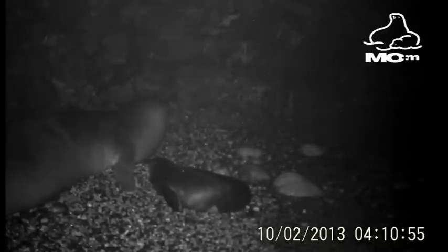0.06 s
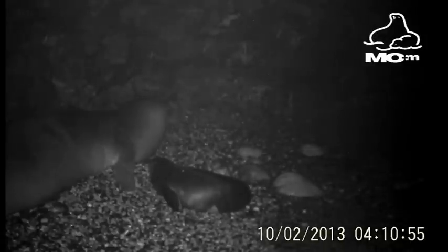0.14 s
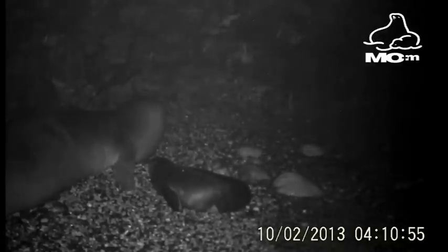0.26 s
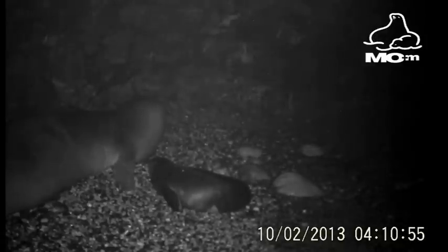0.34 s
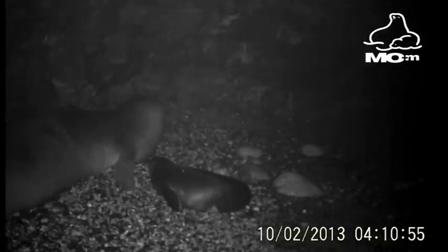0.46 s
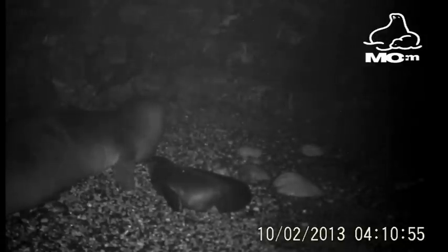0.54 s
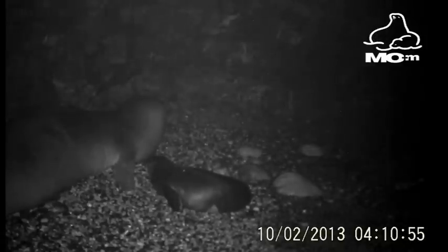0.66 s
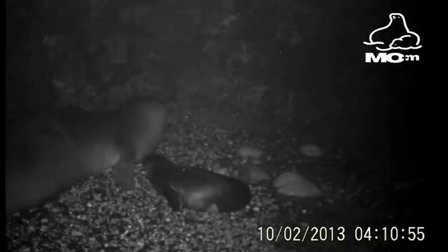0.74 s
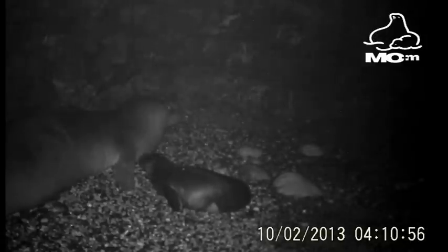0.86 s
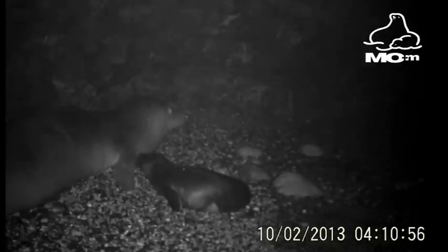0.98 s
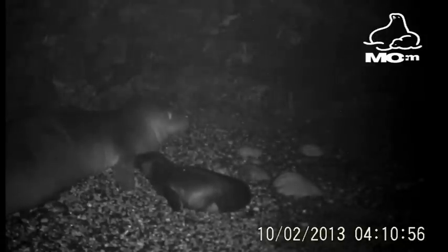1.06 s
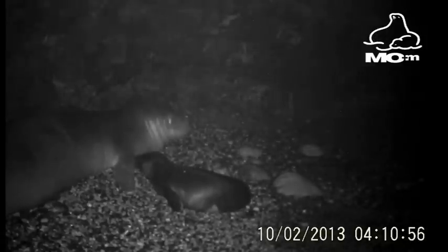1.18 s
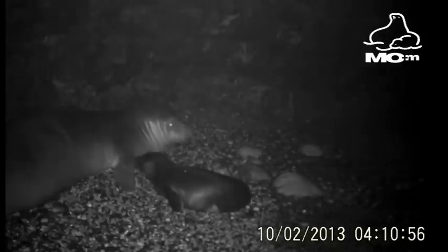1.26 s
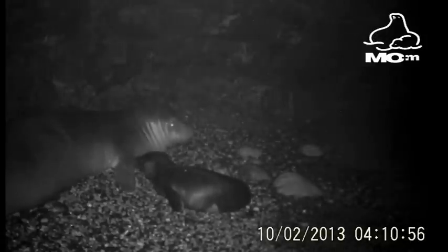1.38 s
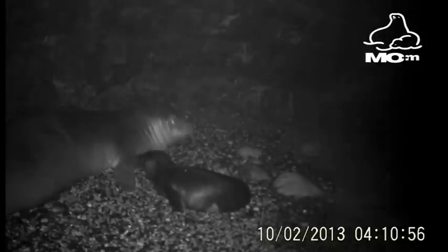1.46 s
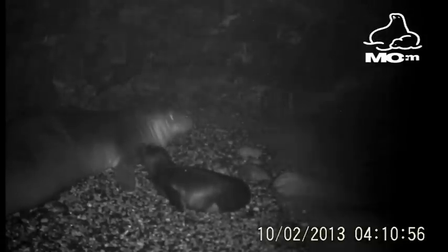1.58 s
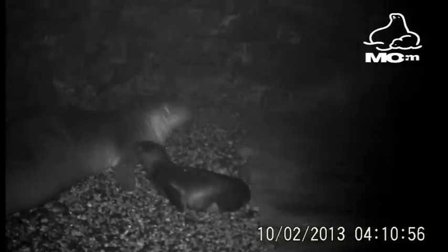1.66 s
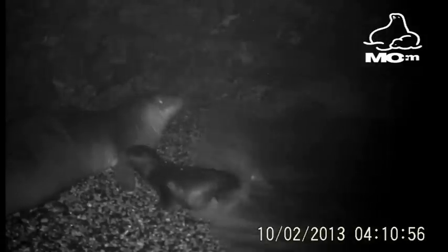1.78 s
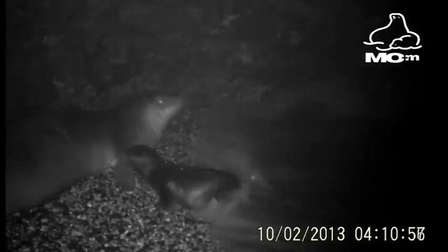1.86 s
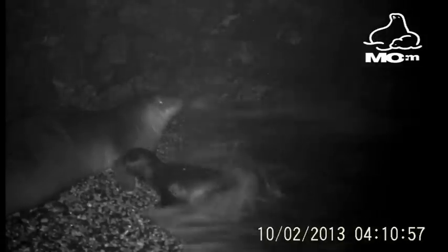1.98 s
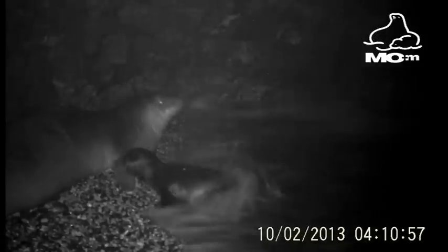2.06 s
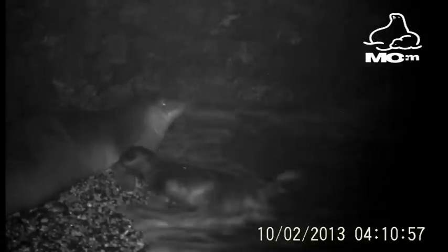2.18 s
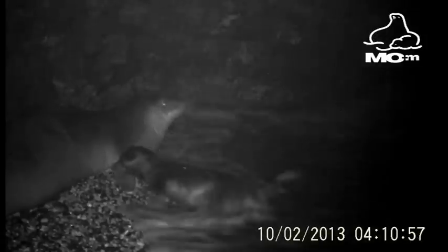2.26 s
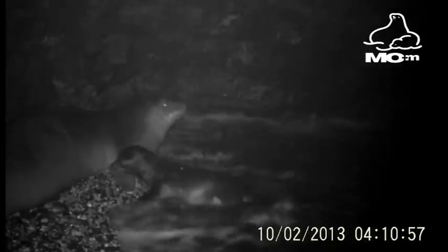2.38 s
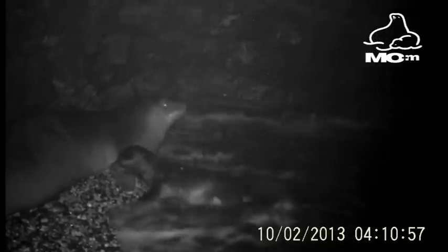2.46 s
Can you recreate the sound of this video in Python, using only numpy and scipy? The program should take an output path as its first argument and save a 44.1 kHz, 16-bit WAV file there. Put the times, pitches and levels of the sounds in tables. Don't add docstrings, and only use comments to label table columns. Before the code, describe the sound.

A sea wave in a rocky cave. Faint bubbly foam hiss with soft low air thuds at 0.2-0.4 s; the rush swells from 0.7 s, with a small slap near 0.9 s. At 1.0 s the crest breaks in a dull hollow thump, tumbling and gurgling, with another low blow at 1.35 s. Hissing foam lingers, light slaps at 1.55-1.95 s, then it drains and fades by 2.5 s.

```python
import sys
import numpy as np
from scipy import signal
from scipy.fft import rfft, irfft
from scipy.io import wavfile
from scipy.ndimage import uniform_filter1d

SR = 44100
rng = np.random.default_rng(int(sys.argv[2]) if len(sys.argv) > 2 else 0)


def voltage_ratio(decibels):
    exponent = np.asarray(decibels, float) / 20
    return 10 ** exponent


def generate_wav(signal):
    frames = np.transpose(np.atleast_2d(signal))
    scaled = np.clip(frames, -1, 1) * 32767
    pcm = np.round(scaled).astype(np.int16)
    wavfile.write(sys.argv[1], SR, pcm)


N = 112455


def rms_one(x):
    return x / np.sqrt(np.mean(x ** 2) + 1e-20)


def in_time(rows):
    s, *columns = np.transpose(rows)
    return [np.interp(np.arange(N) / SR, s, column) for column in columns]


def drift(rate_hz):
    thin = 40
    pole = np.exp(-2 * thin * np.pi * rate_hz / SR)
    white = rng.standard_normal(N // thin + 2002)
    slow = signal.lfilter([1], [1, -2 * pole, pole * pole], white)[2000:]
    return np.interp(np.arange(N) / thin, np.arange(len(slow)), rms_one(slow))


def flutter(rate_hz):
    x = drift(rate_hz)
    return rms_one(x - uniform_filter1d(x, size=int(SR / 4)))


def band(x, low_hz, high_hz, order=2):
    return signal.sosfilt(signal.butter(order, [low_hz, high_hz], "band", fs=SR, output="sos"), x)


def between(x, low_hz, high_hz, edge_hz):
    hz = np.fft.rfftfreq(N, 1 / SR)
    keep = np.clip(.5 + np.minimum(hz - low_hz, high_hz - hz) / edge_hz, 0, 1)
    return irfft(rfft(x) * np.sin(keep * np.pi / 2) ** 2, N)


def churn(colour, patchy_db, shared, tilt_db=0):
    hz, db = np.transpose(colour)
    edges = 14 * 2 ** np.arange(0, 10, 1 / 3)
    white = rng.standard_normal((2, N + SR))
    together = flutter(10.3) + flutter(30)
    out, power = 0, 0
    for k, (low, high) in enumerate(zip(edges, edges[1:])):
        mid = np.sqrt(low * high)
        level = np.interp(np.log(mid), np.log(hz), db, left=-70, right=-70)
        flicker = patchy_db * (shared * together + flutter(9.1))
        if level > -69:
            tilted = level + tilt_db * np.log2(mid / 2500)
            out = out + voltage_ratio(tilted + flicker) * band(white[k % 2], low, high)[SR:]
            power = power + voltage_ratio(tilted) ** 2 * (high - low)
    return out / np.sqrt(2 * power / SR)


def bubbles(level_db):
    per_second, cycles, pitches = 5000, 4, 24
    sizes = voltage_ratio(4.7 * np.minimum(rng.exponential(1, N), 5)) * rng.choice([-1, 1], N)
    crowding_db = .5 * (level_db - level_db.mean()) + 2.5 * flutter(10)
    born = rng.random(N) < per_second * voltage_ratio(crowding_db) / SR
    dealt = rng.integers(0, pitches, N)
    out = 0
    for k, hz in enumerate(np.geomspace(930, 3830, pitches)):
        r, w = voltage_ratio(-60 * hz / (cycles * SR)), 2 * np.pi * hz / SR
        bursts = sizes * born * (dealt == k) + 1e-18
        out = out + signal.lfilter([0, np.sin(w)], [1, -2 * r * np.cos(w), r * r], bursts)
    return out / np.sqrt(uniform_filter1d(out ** 2, size=8000) + 1e-20)


# [t/s, level/dB, tilt/(dB per octave), bubbles over hiss/dB]
FOAM_COURSE = [(0, -41, 4, -5), (.2, -38.5, 3, -16), (.45, -37, 4, -5), (.68, -33.5, 2.5, -7.5),
               (.8, -32.5, 3, -20), (.9, -29.5, 2, -8.5), (1.0, -27.5, 3, -3), (1.1, -27, 2, -7.5),
               (1.36, -27, 2.5, -8.5), (1.47, -29, 1.5, -4.5), (1.58, -29.5, 1, -3.5),
               (1.69, -29.5, 1, -10), (1.82, -29, 1, -7.5), (1.95, -31, 1.5, -4), (2.15, -33.5, 0.5, -6),
               (2.3, -36.5, 0.5, -11), (2.44, -39, 1, -8), (2.55, -37.5, 3.5, -6)]
# [f/Hz, level/dB per Hz]
FOAM_SPECTRUM = [(290, -5), (500, -8.5), (659, -5.5), (1020, 0), (2430, -3), (5210, -10.5), (10000, -22.5),
                 (13000, -30.5), (22000, -120)]


def foam():
    level_db, tilt_db, bubble_db = in_time(FOAM_COURSE)
    hiss = churn(FOAM_SPECTRUM, 0.57, 0.52, tilt_db)
    return voltage_ratio(level_db) * (hiss + voltage_ratio(bubble_db) * bubbles(level_db))


# [t/s, level/dB, tilt/(dB per octave)]
TUMBLE_COURSE = [(0, -43.5, 0), (.06, -38, 1), (.35, -39, 1), (.55, -38, .5), (.72, -38, 2.5),
                 (.83, -35.5, 1), (.96, -31, 2.5), (1.02, -23.5, 1.5), (1.12, -29, 0.5), (1.22, -28.5, 0),
                 (1.38, -28, -0.5), (1.46, -34, -1.5), (1.58, -37, 2.5), (1.74, -39, 0), (1.86, -35, 2),
                 (2.0, -36.5, -2.5), (2.22, -41, -2), (2.55, -42, 1.5)]
# [f/Hz, level/dB per Hz]
TUMBLE_SPECTRUM = [(60, -27.5), (95, -9), (140, -6), (215, 1), (300, -3.5), (450, -2.5), (750, -8),
                   (1500, -27.5)]
# [f/Hz, level/dB per Hz]
VAULT_SPECTRUM = [(15, -10), (30, 1), (55, -3), (90, -7.5), (140, -37.5)]


def tumble():
    level_db, tilt_db = in_time(TUMBLE_COURSE)
    roar = voltage_ratio(level_db) * churn(TUMBLE_SPECTRUM, 1.28, 0.5, tilt_db)
    hum_db = -47 + .35 * (level_db - level_db.mean())
    return roar + voltage_ratio(hum_db) * churn(VAULT_SPECTRUM, 1.2, 0.22)


# [peak t/s, level/dB, f/Hz, decay/s]
AIR_POCKETS = [(.06, -42.5, 35.2, .03), (.23, -33.5, 32.8, 0.038), (0.226, -37, 205, 0.022),
               (.35, -34, 36, 0.044), (.41, -31, 32.7, .035), (.6, -31.5, 231, 0.018),
               (0.688, -32.5, 220, 0.012), (0.879, -32, 201.4, 0.046), (0.929, -22.5, 213, 0.018),
               (.996, -22, 265, .005), (1.228, -33, 118, 0.02), (1.006, -31, 123, 0.057),
               (1.041, -30, 45, 0.041), (1.03, -18.5, 257, 0.024), (1.06, -24, 248, 0.025),
               (1.073, -23.5, 55, .02), (1.112, -29, 240, .025), (1.109, -31, 94.5, 0.019),
               (1.27, -34, 50, 0.025), (1.151, -26.5, 52, 0.035), (1.19, -33.5, 219, 0.06),
               (1.31, -28, 66.7, 0.1), (1.337, -23.5, 172, 0.016), (1.375, -25, 62.3, 0.035),
               (1.369, -33, 198, 0.032), (1.481, -38.5, 60.2, .04), (1.82, -39, 59.5, 0.05),
               (1.92, -35, 248, 0.035), (2.059, -39.5, 172.6, 0.041), (2.251, -40, 60, 0.063)]
# [peak t/s, level/dB, f/Hz, decay/s]
CREST_AIR = (1.0072, -13, 175, .0065)


def pockets():
    rise_share, glide = 0.75, 0.071
    out = np.zeros(N)
    for s, db, hz, decay in AIR_POCKETS + [CREST_AIR]:
        decay = max(decay, .003)
        t = (np.arange(N) / SR - s) / decay
        shape = np.where(t < 0, np.exp(-(t / rise_share) ** 2), np.exp(-np.abs(t) ** 0.87))
        turns = hz * decay * (t + .5 * glide * np.clip(t, -3, 3) ** 2)
        out -= voltage_ratio(db) * shape * np.cos(2 * np.pi * turns)
    return out


# [t/s, level/dB, length/s, top f/Hz]
STONE_SPLASHES = [
    (0.222, -41, .015, 2500),
    (0.872, -32.5, 0.015, 1500),
    (0.92, -29.5, 0.0056, 6000),
    (1.003, -24.5, 0.012, 790),
    (1.338, -27.5, 0.024, 700),
    (1.375, -38, 0.011, 3000),
    (1.568, -34, 0.022, 3000),
    (1.829, -34.5, 0.024, 3000),
    (1.929, -29, 0.012, 1200),
]


def slap():
    out, white = np.zeros(N), rng.standard_normal(N)
    for s, db, length, top_hz in STONE_SPLASHES:
        t = (np.arange(N) / SR - s) / length
        out += voltage_ratio(db) * np.exp(-t ** 2) * rms_one(band(white, 300, top_hz, order=1))
    return out


def cave(x):
    t60_s, wall_cut_hz = 0.73, 2500
    out, dull = np.zeros(N), np.exp(-2 * np.pi * wall_cut_hz / SR)
    for k, lag in enumerate((rng.uniform(.025, .06, 8) * SR).astype(int)):
        loop, gain, state = x.copy(), voltage_ratio(-60 * lag / SR / t60_s), [0.]
        for i in range(lag, N, lag):
            back, state = signal.lfilter([gain * (1 - dull)], [1, -dull], loop[i - lag:i], zi=state)
            loop[i:i + lag] += back[:N - i]
        out += (loop - x) * (-1) ** k
    return out


# [centre t/s, low f/Hz, high f/Hz, level/dB]
SIDE_BANDS = [
    (.4257, 6200, 7600, -52),
    (.8204, 4150, 5200, -48),
    (1.8885, 6850, 8300, -49),
    (2.2368, 6200, 8300, -58),
    (2.2368, 4150, 5200, -54),
    (2.3761, 6850, 8300, -59),
    (2.3761, 4150, 5200, -56),
]


def side_noise():
    side, t = np.zeros(N), np.arange(N) / SR
    for s, low_hz, high_hz, db in SIDE_BANDS:
        gate = np.cos(np.pi * np.clip((t - s) / .046, -.5, .5))
        side += voltage_ratio(db) * gate * rms_one(between(rng.standard_normal(N), low_hz, high_hz, 100))
    return side


def scene():
    water = foam() + tumble()
    hits = pockets() + slap()
    mono = water + hits + voltage_ratio(-26.5) * cave(hits)
    return np.array([mono, mono])


def band_limit(x):
    return signal.sosfilt(signal.butter(12, 11130, fs=SR, output="sos"), x)


def record(dry):
    cut = between(dry, -1000, 10080, 180)
    mix = cut + side_noise() * [[1], [-1]] + .0026
    return band_limit(mix)


dry = scene()
out = record(dry)
generate_wav(out)
```